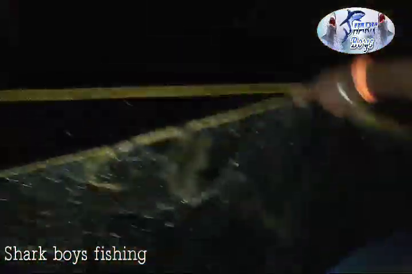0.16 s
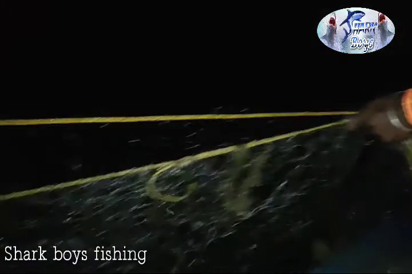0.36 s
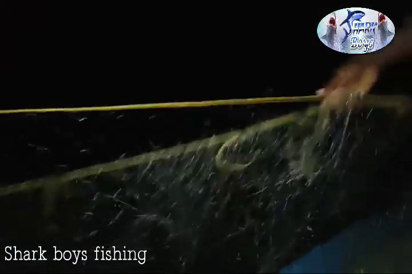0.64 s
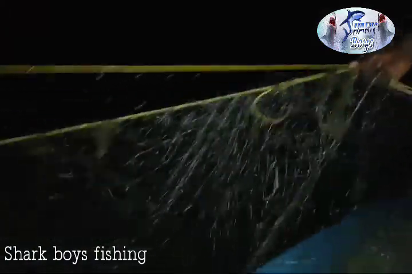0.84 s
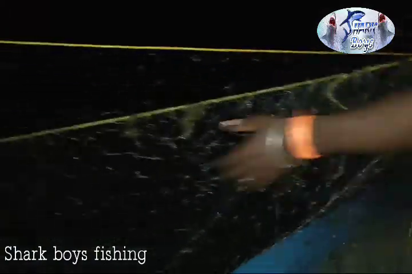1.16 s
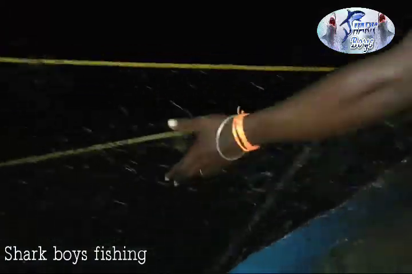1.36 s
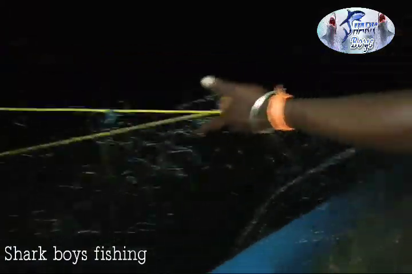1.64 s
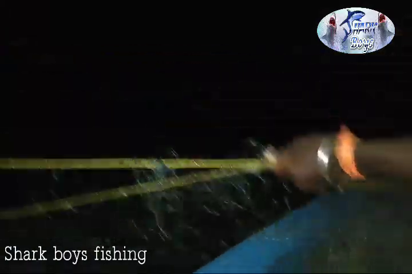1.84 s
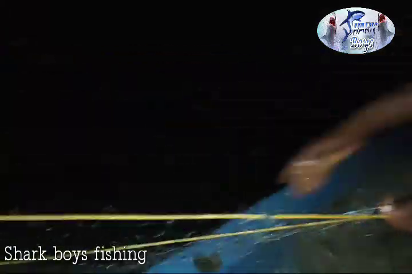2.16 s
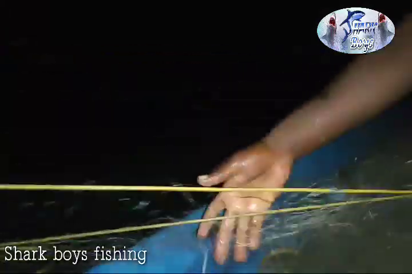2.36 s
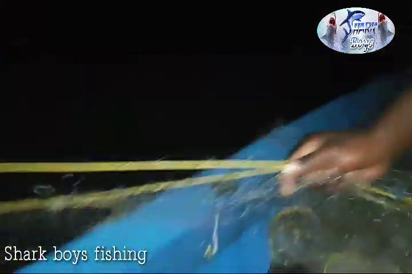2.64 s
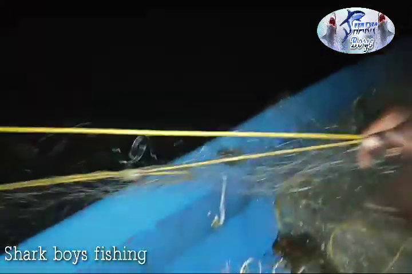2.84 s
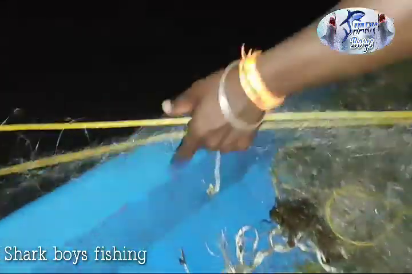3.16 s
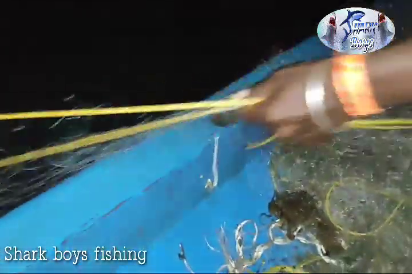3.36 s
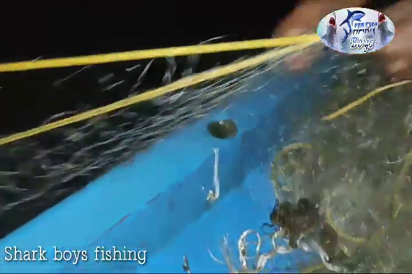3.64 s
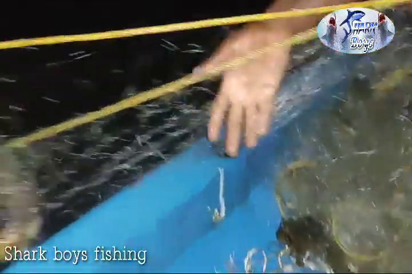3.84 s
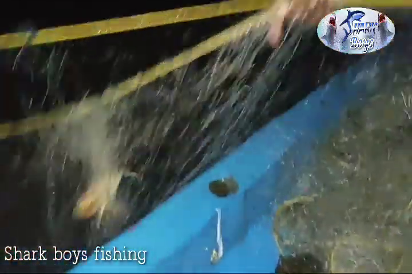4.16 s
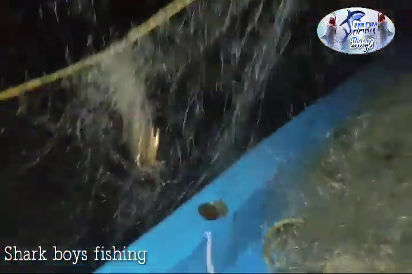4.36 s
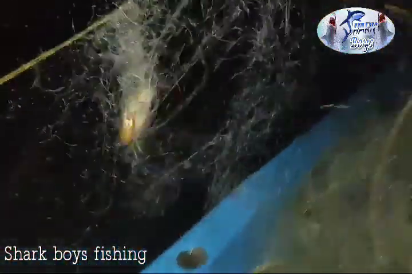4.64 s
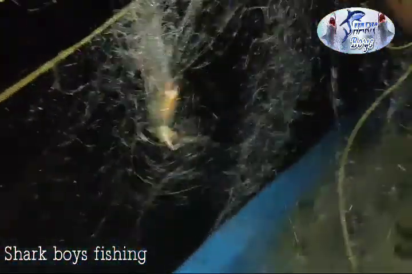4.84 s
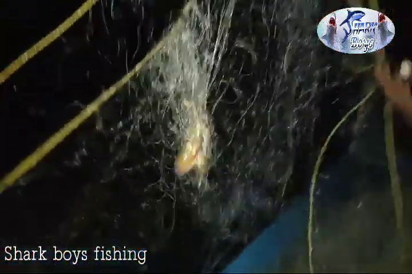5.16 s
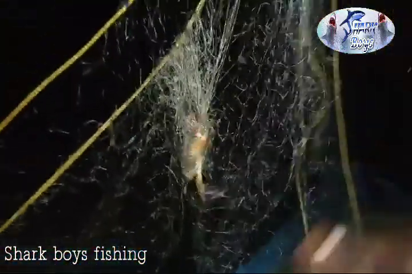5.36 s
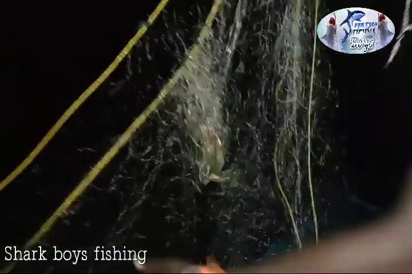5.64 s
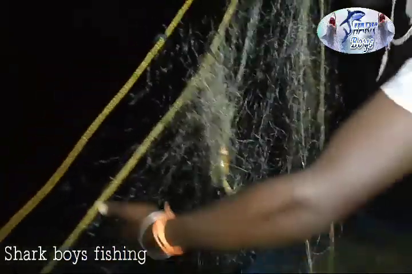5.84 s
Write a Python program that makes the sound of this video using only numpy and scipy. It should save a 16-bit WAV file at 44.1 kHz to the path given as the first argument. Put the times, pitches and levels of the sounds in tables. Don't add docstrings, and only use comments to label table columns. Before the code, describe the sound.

Close, rough outdoor sound from a small camera in open wind: booming rumble and distorted pops jump between left and right. Beneath it a soaked net rubs over a hull in short wet rasps with knocks and fizzing spray, strongest around three to four seconds, left of centre. Little ringing drips follow after five seconds. A thin high katydid rasp, throbbing insects and distant water hiss stay very quiet underneath.

```python
import sys
import numpy as np
from scipy import signal
from scipy.fft import rfft, irfft
from scipy.io import wavfile
from scipy.ndimage import uniform_filter1d, map_coordinates

SR = 44100
rng = np.random.default_rng(int(sys.argv[2]) if len(sys.argv) > 2 else 0)


def to_wav(sig):
    pcm = np.clip(np.atleast_2d(sig), -1, 1) * 32767
    pcm = np.round(pcm).astype(np.int16)
    wavfile.write(sys.argv[1], SR, pcm.T)


def voltage_ratio(decibels):
    exponent = np.asarray(decibels, float) / 20
    return 10 ** exponent


N = 264600

# t/s, strength/dB, speed/dB
AIR_LEFT = [(0, -23.5, -7), (.1, -23, -4), (.18, -20, -3), (.35, -34, -2.5), (.7, -30, -3),
            (1.18, -36.5, 0), (1.68, -26.5, -3), (2.2, -29, -3), (2.56, -19, -3), (2.8, -28, -1.5),
            (3.08, -26.5, -3), (3.45, -27, -2.5), (3.97, -16.5, -3), (4.1, -23, 0), (4.73, -15, -2),
            (4.97, -19, -0.6), (5.2, -27, -0.84), (6, -31.5, -1)]
AIR_RIGHT = [(0, -27, -6), (.1, -31, -4.5), (.17, -15.5, 0.98), (.66, -13, -0.8), (1, -18, -0.5),
             (1.28, -14.5, -0.5), (1.37, -12.5, 0.6), (1.9, -10.5, 2), (2.83, -14, 0.75), (2.88, -16.5, -2),
             (3.38, -13.5, 0.5), (3.62, -14.5, 1.5), (3.86, -13, 1.5), (3.9, -25, -3.5), (3.97, -17, 0.5),
             (4.3, -25, -1.5), (5.62, -20.5, -2.5), (5.79, -11, -2.5), (6, -26.5, -2)]
# t/s, lift/dB, length/s
BUFFETS_LEFT = [(0.104, -4, .1), (0.304, -1.5, 0.13), (.5, 2, 0.2), (.7, -5, 0.16), (1.1, -1, .2),
                (1.596, -3, .2), (1.397, 6, 0.032), (1.73, 6, 0.37), (2.114, 6.5, 0.29),
                (2.378, 10.5, 0.11), (2.952, 6.5, 0.11), (3.063, -9, 0.21), (3.55, 5.5, 0.13),
                (3.961, 2.5, 0.037), (4.21, 8.5, 0.18), (4.523, 3, 0.52), (4.99, 3.5, 0.087),
                (6, 22, 0.013)]
BUFFETS_RIGHT = [(.17, 3, 0.069), (.45, -4.5, 0.37), (.66, 6, 0.05), (1.7, -3.5, .2), (2.3, 2.5, 0.2),
                 (4.9, 5, .4), (2.44, -11, 0.088), (2.7, -1, 0.2), (2.95, 1, 0.27), (3.4, 6.5, 0.086),
                 (3.57, -23, 0.047), (3.91, -2, 0.1), (4.021, 4, 0.041), (4.39, 11.5, 0.22),
                 (5.3, 12, 0.095), (5.57, -9, 0.088), (5.68, -3.5, 0.082), (5.79, 4.5, 0.31)]
# t/s, level/dB, length/ms
PUFFS_LEFT = [(.07, -26.5, 27), (.18, -14.5, 38.4), (0.626, -14.5, 75), (0.914, -21, 35), (1.398, -48, 14),
              (1.778, -23.5, 23.6), (1.947, -19, 17), (2.11, -12.5, 23), (2.187, -18, 20),
              (2.359, -23, 37.6), (2.388, -26, 19), (2.817, -14.5, 25.2), (3.598, -22.5, 14),
              (3.779, -14.5, 21.3), (3.809, -14, 20), (3.904, -10, 14), (3.956, -29, 51),
              (4.358, -12.5, 20.4), (4.397, -20, 11), (4.465, -18.5, 32), (4.521, -23, 12),
              (4.561, -11, 21.2), (4.576, -10.5, 6.9), (4.678, -22.5, 15), (4.739, -19.5, 13.7),
              (4.753, -24, 10.8), (4.81, -7.5, 10.9), (4.817, -9.5, 22.6), (4.917, -24, 11.7),
              (4.937, -9, 21.2), (4.975, -16, 16.3), (5.004, -24, 14), (5.05, -27, 17), (5.15, -20, 20.8),
              (5.329, -31, 13.4), (5.346, -26.5, 9.5), (5.553, -24, 11.3), (5.414, -21, 16.8),
              (5.668, -19.5, 13.3), (4.941, -14.5, 17.4), (4.822, -14, 14.4), (3.9, -13.5, 11.1)]
PUFFS_RIGHT = [(0.18, -14, 45), (0.329, -19, 14.7), (0.357, -23.5, 15), (0.436, -15, 11.5),
               (0.594, -24, 9.5), (0.62, -15.5, 28), (0.658, -13.5, 14.8), (0.68, -15, 10.8),
               (0.731, -16, 11.7), (0.78, -17.5, 17.8), (0.822, -19, 15), (1.062, -18.5, 18),
               (1.308, -33, 16), (1.331, -15, 12.4), (1.366, -27, 11.6), (1.384, -16.5, 12.2),
               (1.46, -17.5, 13), (1.493, -16, 14), (1.63, -10.5, 25.7), (1.647, -13, 12.9),
               (1.684, -23, 12), (1.694, -17.5, 9.9), (1.739, -22, 9.2), (1.769, -16.5, 20),
               (1.846, -15, 16.8), (1.905, -12.5, 11.6), (1.924, -9.5, 10.8), (1.961, -23, 12),
               (1.994, -16, 11.6), (2.025, -11.5, 9.3), (2.063, -20, 14.6), (2.106, -10.5, 7.5),
               (2.129, -18, 11.7), (2.177, -24, 11), (2.216, -30, 11.3), (2.26, -28, 16),
               (2.301, -12.5, 19.7), (2.612, -15.5, 15.6), (2.826, -18, 10.7), (3.627, -21, 7.7),
               (3.648, -17, 11.2), (3.742, -17, 10.6), (3.827, -11, 11.9), (3.864, -11.5, 17.7),
               (3.965, -11, 30.7), (4.846, -21, 19), (5.281, -16, 15.4), (5.308, -12.5, 26.3),
               (5.414, -15.5, 21.3), (5.683, -18.5, 14.4), (5.74, -16.5, 19.4), (5.763, -13, 33),
               (5.776, -13, 23.2), (5.818, -10.5, 19), (5.874, -15, 18)]
# t/s, push + or suck - / share of full scale
JABS_LEFT = [(.6158, 0.34), (1.9489, -0), (2.3857, -0.6), (3.7793, .5), (3.8116, -.45), (3.94, -0.7),
             (3.9677, -0.7), (4.4805, -0.34), (4.6768, -0.68), (4.7385, -0.65), (4.8137, -1),
             (4.9343, -0.73), (4.9385, -0.2)]
JABS_RIGHT = [(.18, -0.89), (.261, 0.54), (.274, 0.8), (.3059, .5), (.4342, 0.56), (.6099, 1.5),
              (.656, 0.95), (.7535, 0.96), (1.1666, 0.24), (1.2385, 0.44), (1.5501, -1.2), (1.6084, -0.27),
              (1.7385, -0.11), (1.7689, 0.84), (1.9609, -0.58), (2.1466, -1.1), (2.2968, -.7), (3.3462, 1),
              (3.3711, 1.3), (3.384, -0.41), (3.6532, -0.17), (3.7847, 0.26), (4.3499, -0.68),
              (5.4001, 0.76), (5.7608, 1.1), (5.766, -1.1), (5.7741, -0.96), (5.781, 1.3), (5.8012, -0.39),
              (5.8149, -1.1), (5.8185, 0.99), (5.872, -.8), (5.887, .6)]
JAB_MS, REBOUND, REBOUND_MS = 1.1, 0.3, 3.5
# f/Hz, density/dB per Hz
RUMBLE = [(2, -18), (8, 10), (20, 16.5), (35, 9.5), (60, 7), (100, -7), (200, -50.5)]
# f/Hz, density/dB per Hz
EDDY = [(20, -8.5), (60, -1), (120, 1), (220, -3.5), (320, -11), (480, -21), (700, -32), (1000, -46),
        (1500, -59), (2500, -85)]

# start t/s, length/s, scrape level/dB, spray above it/dB
TUGS = [(0.04, 0.024, -53, -10), (1.18, 0.26, -58, -10), (1.425, 0.23, -55, 1.5), (2.173, 0.091, -61, 18),
        (2.507, 0.17, -43.5, 3), (2.656, 0.19, -43.5, -0.5), (2.837, 0.068, -55.5, 12),
        (2.913, 0.1, -54, 6.5), (3.026, 0.097, -36.5, 3), (3.093, 0.27, -30, 2), (3.195, 0.13, -31.5, -6),
        (3.304, 0.13, -28, -9.5), (3.462, 0.11, -52, -1.5), (3.624, 0.18, -58.5, -17),
        (3.923, 0.097, -56.5, 4), (4.096, 0.014, -46, -8), (4.097, 0.063, -36, -3),
        (4.15, 0.026, -29.5, -15), (4.181, 0.1, -33.5, -4.5), (4.27, 0.075, -49, -3),
        (4.412, 0.08, -49.5, -15), (4.597, 0.082, -51, -7), (5.137, 0.1, -53, -0.5), (5.235, 0.18, -57, -8),
        (5.355, 0.2, -52.5, -9), (5.54, 0.26, -57, -3), (5.803, 0.073, -57, -11)]
SLACK_DB, SLACK_SPRAY_DB = -59, -56
BITE_SHARE, LET_GO_DB_PER_S, SAG_DB_PER_S = 0.39, 498, 0.5
# f/Hz, density/dB per Hz
SCRAPE = [(150, -11), (350, 12), (700, 2.5), (1100, -2.5), (1500, -7), (2000, -3.5), (3000, -1.5),
          (4300, -10), (6000, -25.5), (10000, -21.5)]
# f/Hz, density/dB per Hz
SPRAY = [(2500, -25.5), (4500, -5), (6000, -6), (9400, -3), (11500, -9.5), (13900, -10), (15500, -13)]
# f/Hz, width/Hz, level/dB
HULL = [
    (1010, 30, -55),
    (1830, 82, 0),
    (2250, 24, 8.5),
    (2870, 29, -8.5),
    (4300, 97, -8),
    (6840, 100, -15),
]
# t/s, peak level/dB, f/Hz
SLAPS = [(0.615, -41, 9000), (0.844, -43, 9500), (0.965, -60, 13400), (2.194, -30, 3600),
         (3.147, -24.5, 6000), (3.244, -40, 8000), (3.343, -24, 3620), (3.351, -22, 3550),
         (4.0961, -24, 3600), (4.1595, -19.5, 3600), (4.2663, -20.5, 2980), (4.722, -37, 6000),
         (4.575, -38, 2000), (4.635, -46, 2500), (4.654, -44, 2500), (4.809, -38, 1790),
         (4.842, -36.5, 3000), (5.021, -39, 6460), (5.815, -31, 2480)]
# start t/s, length/s, level/dB, f/Hz, width/Hz
RUBS = [(3.035, 0.2, -37.5, 2200, 1300), (3.041, 0.28, -42.5, 890, 580), (3.205, 0.033, -32, 1920, 220),
        (3.2, 0.076, -36, 2980, 210), (3.372, 0.055, -29.5, 1040, 200), (4.096, 0.082, -26.5, 510, 370),
        (3.7, 0.2, -35.5, 1060, 300), (4.168, 0.13, -34.5, 630, 490), (4.261, 0.036, -38.5, 2500, 450),
        (4.312, .025, -57, 2800, 700), (5.2, 0.056, -46, 1300, 420), (3.25, .2, -41.5, 1700, 2000),
        (3.4, 0.081, -42.5, 7900, 4000), (1.2, 0.45, -58.5, 4000, 3800), (3.47, 0.051, -46, 510, 400),
        (4.19, .045, -43.5, 2800, 690), (4.13, 0.034, -48, 4300, 610), (5.81, 0.015, -31.5, 970, 950),
        (0.057, .02, -57, 4800, 2000), (4.097, 0.22, -44, 1300, 830), (4.17, 0.098, -49, 8600, 4500),
        (3.26, 0.13, -42, 8500, 3100), (3.05, 0.1, -42, 7500, 4000), (4.8, .3, -55, 1500, 1000),
        (5.665, 0.047, -50, 9000, 2500), (5.72, .065, -44.5, 1500, 1100), (3.9, .04, -42, 1050, 230)]
# t/s, peak level/dB, f/Hz
DRIPS = [(4.0194, -44.5, 2670), (4.439, -47, 2420), (4.4551, -41, 2600), (4.459, -36.5, 2900),
         (4.4976, -44.5, 2870), (5.186, -53, 2600), (5.229, -51, 2610), (5.2405, -41, 2150),
         (5.255, -43, 1580), (5.264, -38, 1700), (5.271, -37.5, 2180), (5.286, -48, 1790),
         (5.299, -41, 1490), (5.305, -47, 2980), (5.335, -43, 1500), (5.3487, -46, 2150),
         (5.374, -48, 1610), (5.384, -46, 3580), (5.397, -45, 1400), (5.423, -38, 2700), (5.431, -41, 1890),
         (5.4454, -54, 3100), (5.458, -49, 2200), (5.475, -46, 1850), (5.487, -46, 1610),
         (5.496, -41.5, 2280), (5.505, -56, 1900), (5.546, -51, 1700), (5.664, -47, 2520),
         (5.7436, -45, 2310), (5.813, -47, 2280)]
# t/s, peak level/dB, f/Hz
TICKS = [
    (2.563, -43, 7000),
    (2.659, -44, 7000),
    (2.79, -42, 7000),
    (3.385, -27, 6900),
    (3.683, -43, 2950),
    (5.191, -42, 8000),
    (5.236, -40, 7500),
    (5.316, -39, 7700),
    (5.475, -40, 7540),
    (5.488, -40, 8000),
]
LAG = 14

# first stroke's peak t/s, level/dB, strokes/count
CHIRPS = [(.114, -52, 2), (.378, -47.5, 2), (.578, -56, 1), (.703, -45, 2), (.844, -55, 1), (1, -48, 2),
          (1.326, -49, 2), (1.712, -65, 1), (1.798, -48.5, 2), (2.056, -49, 2), (2.421, -51, 2),
          (2.56, -55, 2), (2.66, -56, 2), (2.875, -43, 1), (3.503, -52, 1), (3.873, -54, 1),
          (4.395, -55.5, 2), (4.654, -47, 2), (4.984, -52, 2), (5.22, -53, 2), (5.373, -51, 2),
          (5.667, -48.5, 2), (5.918, -50, 2)]
STROKE_GAP_S, STROKE_GAIN_DB = 0.064, 2
# f/Hz, density/dB per Hz
HISS = [(710, -40), (1200, -55), (1490, 10.5), (2410, 9.5), (3610, -4), (6870, -36), (7570, -17),
        (11600, 10.5), (14400, 1.5), (15500, -30)]
HISS_DB = -55.5
# f/Hz, width/Hz, throbs per s, level/dB
CHORUS = [
    (6950, 600, 26, -66.5),
    (8530, 420, 34, -74),
]
# f/Hz, share/0-1
STARVED = [(1200, .04), (1500, .1), (3500, .06), (5200, .3), (6200, .08), (10300, .08), (12800, .16),
           (13700, .2), (14800, .7), (15500, .93)]


def wind(air, buffets, puffs, gusty_db, lumpy_db, rumble_db, follows):
    pattern = coloured(rng.standard_normal(2 * N), EDDY)
    gust = 0.3548 * drift(18.87) + 0.6984 * drift(50.8) + 0.5 * drift(113.3)
    speed = np.clip(voltage_ratio(curve(air, column=2) + gusty_db * gust), 0, 3)
    lowpass = signal.butter(4, 3000, fs=SR, output="sos")
    eddies = signal.sosfilt(lowpass, swept(pattern, speed, size=11025))
    eddies = eddies * (0.79 + 0.12 * abs(eddies))
    strength_db, shove_db = curve(air, column=1), buffeting(buffets)
    out = voltage_ratio(strength_db + 0.52 * shove_db + lumpy_db * gust) * eddies
    slow_db = rumble_db + follows * (strength_db + 14.0) + shove_db + 2.44 * drift(9)
    out += voltage_ratio(slow_db) * coloured(rng.standard_normal(N), RUMBLE)
    for (s, db, ms), start in zip(puffs, rng.random(60)):
        add(out, s - ms / 2000, puff(pattern, round(start * N), db, ms))
    return out


def puff(pattern, at, db, ms):
    shape = np.hanning(round(ms * SR / 1000))
    peak_speed = voltage_ratio(5.0 + 0.083 * (db + 16) - 3.377 * np.log(ms / 16))
    rush = peak_speed * (0.402 + 0.566 * shape)
    piece = map_coordinates(pattern[at:at + 8192], [64 + np.cumsum(rush)], order=3)
    u = np.linspace(-1, 1, len(shape)) * 7.86
    flip = np.sin(1.72 * u) * np.exp(-u ** 2 / 1.85)
    return voltage_ratio(db + 3.5) * (evened(piece) * shape + 0.68 * flip)


def swept(pattern, speed, size):
    way, out = np.cumsum(speed), 0
    for at in (np.arange(N), np.arange(N) + size // 2):
        turn = at // size
        fresh = rng.uniform(0, len(pattern) - 3 * size, turn[-1] + 1)
        begun = way[np.searchsorted(turn, turn)]
        fade = np.sin(np.pi * (at % size) / size)
        out = out + fade * map_coordinates(pattern, [fresh[turn] + way - begun], order=1)
    return out


def buffeting(buffets):
    t = np.arange(N) / SR
    return sum(db * np.exp(-(2 * (t - s) / length) ** 2) for s, db, length in buffets)


def jabs(table):
    out, ms = np.zeros(N), np.arange(-441, 442) * 1000 / SR
    shape = np.exp(-(ms / JAB_MS) ** 2) - REBOUND * np.exp(-((ms - 0.8) / REBOUND_MS) ** 2)
    for s, share in table:
        add(out, s - 441 / SR, share * shape)
    return out


def haul():
    slip = 1.58 * drift(41) + 0.52 * drift(5.1)
    struck_db = [db - 7 + 3.9 * drift(5.8) for _, _, db in HULL]
    rung = []
    for _ in range(2):
        ticks = patter(6000, 0.73, 0.94)
        panels = sum(voltage_ratio(db) * resonate(ticks, hz, width) for (hz, width, _), db in zip(HULL, struck_db))
        rung.append(ticks + panels)
    level_db, spray_db = tugging()
    loose = np.clip((-22.5 - level_db) / 18, 0.45, 1)
    froth = loose * bubbles(per_s=800, cycles=8.3, spread_db=4.5)
    scrape = ports(*[coloured(x, SCRAPE) + 0.7 * froth for x in rung], 4.6, 0.033)
    spray = ports(*[coloured(patter(7000, 5.3, 0.7), SPRAY) for _ in range(2)], 3.8, 0.051)
    scrape *= voltage_ratio(level_db + 1.1 * loose * slip)
    spray = spray * voltage_ratio(spray_db - 1.94 + 1.24 * loose * slip)
    return patchy(scrape + spray, depth_db=1.0)


def tugging():
    scrape, spray = np.full(N, voltage_ratio(SLACK_DB)), np.full(N, voltage_ratio(SLACK_SPRAY_DB))
    for s, length, db, spray_db in TUGS:
        t = np.arange(0, length + 0.2, 1 / SR)
        bite = np.minimum(t / (BITE_SHARE * length), 1)
        pull = bite * voltage_ratio(db - SAG_DB_PER_S * t - LET_GO_DB_PER_S * np.maximum(t - length, 0))
        add(scrape, s, pull)
        add(spray, s, pull * voltage_ratio(spray_db))
    return 20 * np.log10(scrape), 20 * np.log10(spray)


def patter(per_s, spread_db, wash):
    size = voltage_ratio(spread_db * np.minimum(rng.exponential(1, N), 4)) * rng.standard_normal(N)
    return evened(size * (rng.random(N) < per_s / SR)) + wash * rng.standard_normal(N)


def bubbles(per_s, cycles, spread_db):
    size = voltage_ratio(spread_db * np.minimum(rng.exponential(1, N), 4)) * (rng.random(N) < per_s / SR)
    kind, out = rng.integers(0, 16, N), np.zeros(N)
    for k, hz in enumerate(np.geomspace(900, 4200, num=16)):
        turns = np.arange(0, 3 * cycles, hz / SR)
        ring = np.sin(2 * np.pi * turns) * turns * np.exp(-3 * turns / cycles)
        out += signal.oaconvolve(size * (kind == k), ring)[:N]
    return evened(out)


def patchy(x, depth_db):
    z = signal.stft(x, nperseg=512)[2]
    islands = rng.standard_normal(z.shape[:0:-1]).T
    islands = uniform_filter1d(uniform_filter1d(islands, size=7, axis=0), size=9, axis=1)
    return signal.istft(z * voltage_ratio(depth_db * evened(islands)), nperseg=512)[1][:, :N]


def rubs():
    out = np.zeros((2, N))
    for s, length, db, hz, width in RUBS:
        t = np.arange(0, length + 0.064, 1 / SR)
        grit = rng.standard_normal((3, len(t)))
        a, b = resonate(resonate(grit[:2], hz, width), hz, 2 * width)
        judder = evened(uniform_filter1d(grit[2], size=300))
        grip = np.minimum(t / 0.011, 1) * voltage_ratio(db + 2.75 * judder - 600 * np.maximum(t - length, 0))
        add(out, s, ports(evened(a), evened(b), 4.0, 0.51) * grip)
    return out


def slaps():
    out, t = np.zeros((2, N)), np.arange(3000) / SR
    for s, db, hz in SLAPS:
        burst = rng.standard_normal((2, len(t)))
        a, b = 0.5 * burst + 0.71 * resonate(burst, hz, 0.82 * hz)
        decay = voltage_ratio(db + 3.0 - 60 * t / 0.022) + voltage_ratio(db - 29 - 60 * t / 0.07)
        add(out, s, ports(a, b, 3.7, 0.55) * decay)
    return out


def drips():
    out, t = np.zeros((2, N)), np.arange(900) / SR
    for s, db, hz in DRIPS:
        splat = evened(resonate(resonate(rng.standard_normal(len(t)), hz, 880), hz, 1600))
        note = 0.6 * np.sin(2 * np.pi * hz * (t + 3.8 * t ** 2)) + 0.47 * splat
        note *= voltage_ratio(db + 8 - 60 * t / 0.016) * (1 - np.exp(-t / 0.0011))
        add(out, s, ports(note, note, 24.1, 1.0))
    return out


def ticking():
    out, t = np.zeros((2, N)), np.arange(600) / SR
    for s, db, hz in TICKS:
        a, b = resonate(rng.standard_normal((2, len(t))), hz, 0.5 * hz)
        decay = voltage_ratio(db + 3.0 - 60 * t / 0.015)
        add(out, s - 0.0015, ports(evened(a), evened(b), 7.4, 0.56) * decay)
    return out


def katydid():
    teeth_per_s = 450 * voltage_ratio(0.5 * drift(90))
    teeth = np.diff(np.floor(np.cumsum(teeth_per_s) / SR), prepend=0) * rng.uniform(0.39, 1.0, N)
    teeth += 0.14 * rng.standard_normal(N)
    low, high = [evened(resonate(resonate(teeth, hz, 1500), hz, 2400)) for hz in (11300, 12000)]
    out, u = np.zeros(N), np.linspace(0, 1, round(0.056 * SR))
    swell = np.sin(np.pi * u ** 1.1) ** 0.77
    for first_s, first_db, count in CHIRPS:
        for k in range(round(count)):
            s, db = first_s + k * STROKE_GAP_S, first_db + k * STROKE_GAIN_DB
            at = min(round((s - 0.038) * SR), N - len(u))
            rasp = (1 - u) * low[at:at + len(u)] + u * high[at:at + len(u)]
            add(out, s - 0.033, voltage_ratio(db + 5.0) * swell * rasp)
    turning_db = np.array([[0.], [-9.]]) + np.array([[0.], [0.6]]) * np.arange(N) / SR
    return ports(out, np.roll(out, 5), 0, 1.0) * voltage_ratio(turning_db)


def night():
    t = np.arange(N) / SR
    hiss = ports(*coloured(rng.standard_normal((2, N)), HISS), 1.5, 0.11)
    out = hiss * voltage_ratio(HISS_DB + 1.5 + 2.0 * drift(10.0))
    for hz, width, per_s, db in CHORUS:
        throb = 0.6 + 0.4 * np.cos(2 * np.pi * per_s * t + 2 * drift(2))
        a, b = resonate(resonate(rng.standard_normal((2, N)), hz, width), hz, width)
        level = voltage_ratio(db + 4.5 + 2.7 * drift(1.0) - 0.27 * t)
        out += ports(evened(a), evened(b), 6.8, 0.27) * throb * level
    return out


def evened(x):
    return x / np.sqrt(np.mean(x ** 2) + 1e-20)


def curve(table, column):
    rows = np.array(table)
    return np.interp(np.arange(N) / SR, rows[:, 0], rows[:, column])


def coloured(x, points):
    f, db = np.transpose(points)
    hz = np.fft.rfftfreq(x.shape[-1], 1 / SR)
    gain = voltage_ratio(np.interp(np.log(hz + 1), np.log(f + 1), db))
    return evened(irfft(rfft(x) * gain, x.shape[-1]))


def drift(per_s):
    hz = np.fft.rfftfreq(N, 1 / SR)
    return evened(irfft(rfft(rng.standard_normal(N)) * np.exp(-(hz / per_s) ** 2), N))


def resonate(x, hz, width):
    return signal.lfilter(*signal.iirpeak(hz, hz / width, SR), x)


def add(mix, s, sound):
    part = mix[..., max(round(s * SR), 0):][..., :sound.shape[-1]]
    part += sound[..., :part.shape[-1]]


def ports(x, other, pan_db, same):
    same = np.clip(same, 0, 1)
    left = np.roll(x, LAG) * voltage_ratio(pan_db / 2)
    right = (same * x + np.sqrt(1 - same ** 2) * other) / voltage_ratio(pan_db / 2)
    return np.array([left, right])


def scene():
    left = wind(AIR_LEFT, BUFFETS_LEFT, PUFFS_LEFT, gusty_db=2.0, lumpy_db=2.5, rumble_db=-15, follows=0.14)
    right = wind(AIR_RIGHT, BUFFETS_RIGHT, PUFFS_RIGHT, gusty_db=1.0, lumpy_db=1.5, rumble_db=-18.5, follows=0.15)
    air = np.array([left + jabs(JABS_LEFT), right + jabs(JABS_RIGHT)])
    return air + haul() + rubs() + slaps() + drips() + ticking() + katydid() + night()


def starved(x, jitter_db, weak_db):
    hz, t, z = signal.stft(x, SR, nperseg=2048, noverlap=1024, window="cosine")
    power = abs(z[:, :1024]) ** 2
    band = power.reshape(2, 128, 8, -1).mean(2)
    band_hz = hz[4:1024:8]
    luck = uniform_filter1d(rng.standard_normal((len(t), 128)).T, size=3)
    luck = evened(uniform_filter1d(luck, size=2, axis=0))
    wind_db = uniform_filter1d(10 * np.log10(power.mean((0, 1)) + 1e-20), size=9)
    insects, middle = band[:, 62:76].mean((0, 1)), band[:, 20:50].mean((0, 1))
    singing = np.log10(insects / (middle + 1e-20) ** 0.7 + 1e-9)
    luck[78:] = luck[78] - 0.33 * wind_db + 3.6 * singing
    thirst = np.select([band_hz < 10500, band_hz < 13400], [8, -4], 2)[:, None]
    need = thirst * np.log10(band.mean(0) + 1e-20) + jitter_db * luck
    rank = need.argsort(1).argsort(1) / len(t)
    group_hz = np.maximum(band_hz // 689 * 689 + 344, 0)
    kept = rank >= np.interp(group_hz, *np.transpose(STARVED), left=0)[:, None]
    line_hz = hz[:1024, None]
    strong = (power > np.repeat(band, 8, 1) * voltage_ratio(2 * weak_db)) | (line_hz < 1200)
    z[:, :1024] *= np.repeat(kept, 8, 0) * strong * (line_hz < 15750)
    return signal.istft(z, SR, nperseg=2048, noverlap=1024, window="cosine")[1][:, :N]


def top_cut(x):
    return signal.sosfilt(signal.butter(12, 15700, fs=SR, output="sos"), x)


def record(dry):
    sharp = 40
    limited = dry / (1 + abs(dry) ** sharp) ** (1 / sharp)
    mix = starved(limited, jitter_db=12.0, weak_db=-3.0)
    return top_cut(mix)


dry = scene()
out = record(dry)
to_wav(out)
```